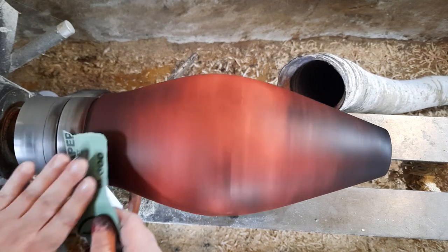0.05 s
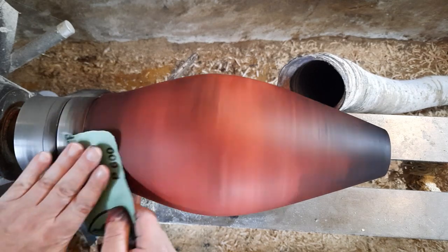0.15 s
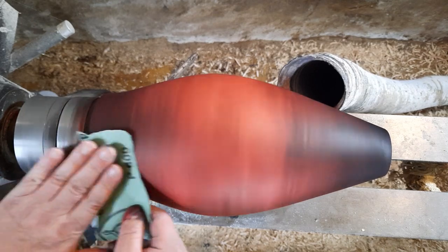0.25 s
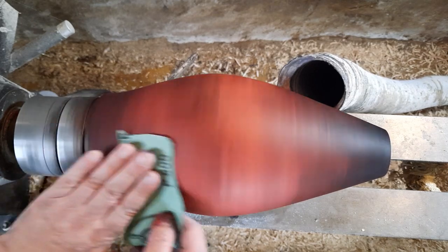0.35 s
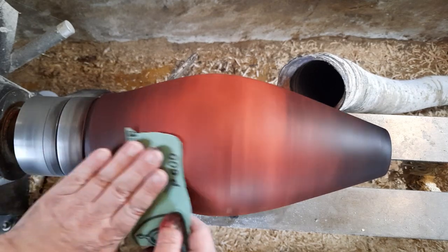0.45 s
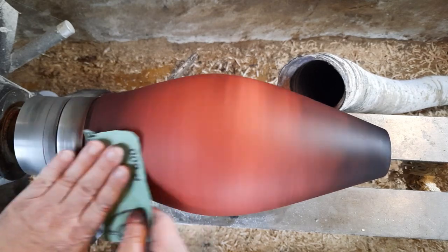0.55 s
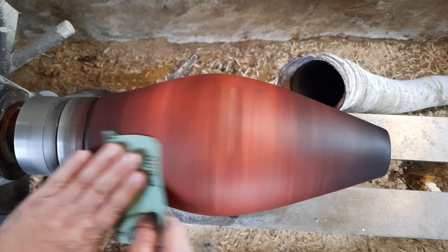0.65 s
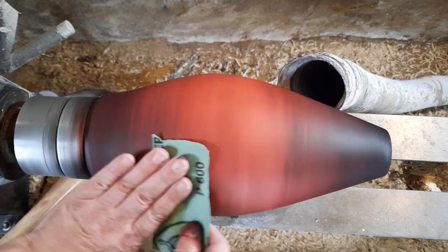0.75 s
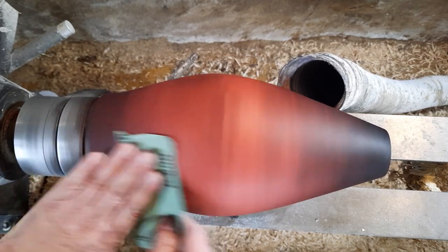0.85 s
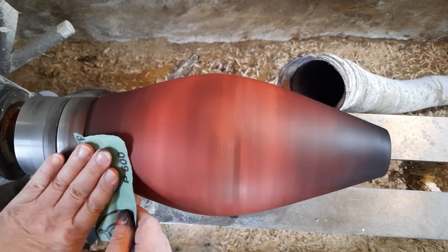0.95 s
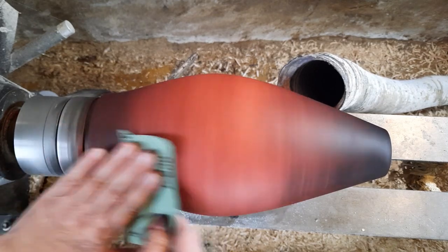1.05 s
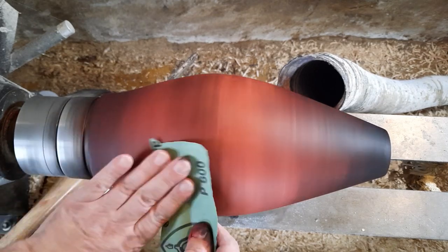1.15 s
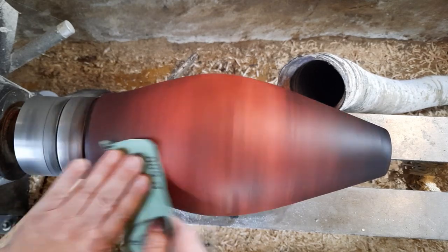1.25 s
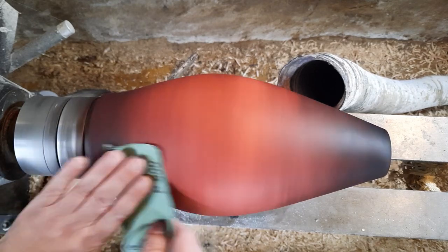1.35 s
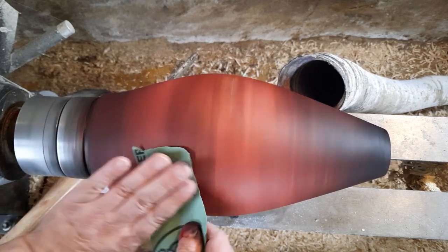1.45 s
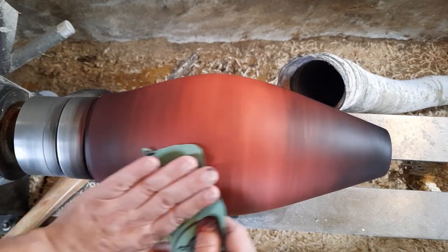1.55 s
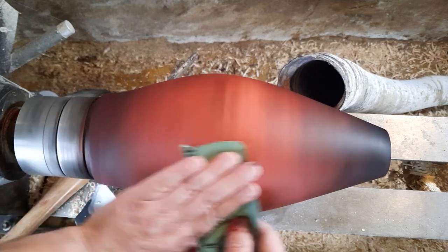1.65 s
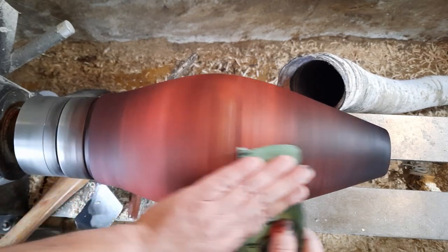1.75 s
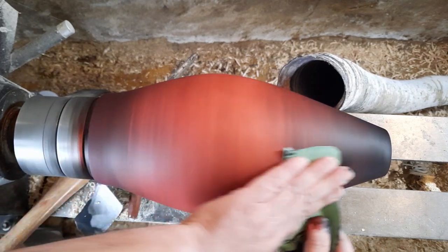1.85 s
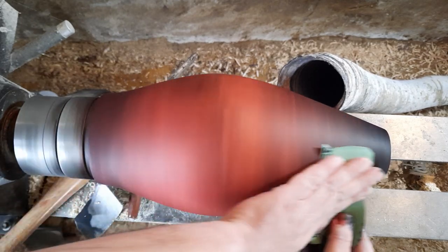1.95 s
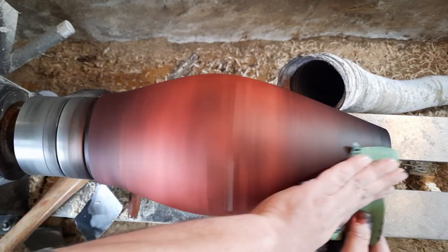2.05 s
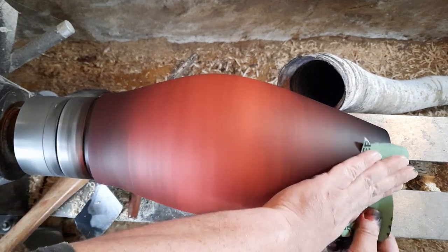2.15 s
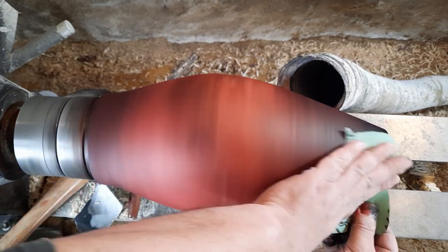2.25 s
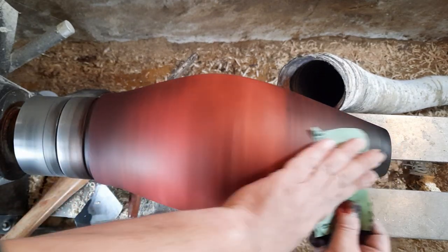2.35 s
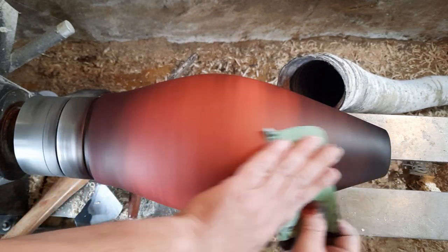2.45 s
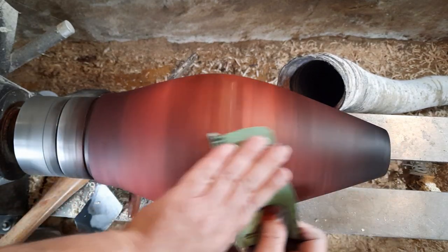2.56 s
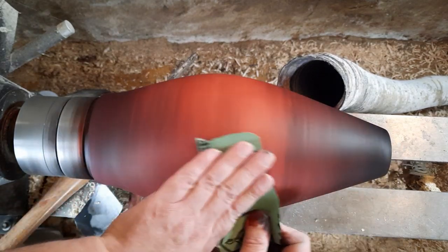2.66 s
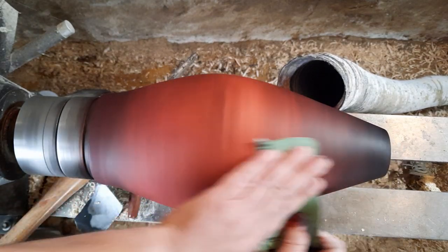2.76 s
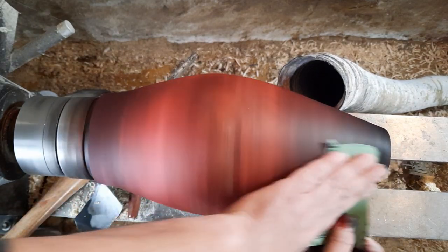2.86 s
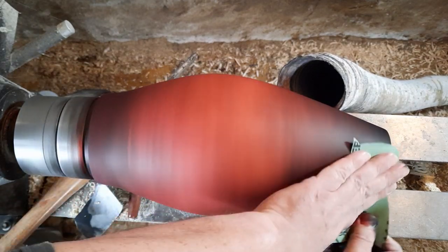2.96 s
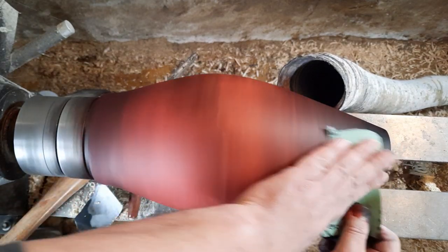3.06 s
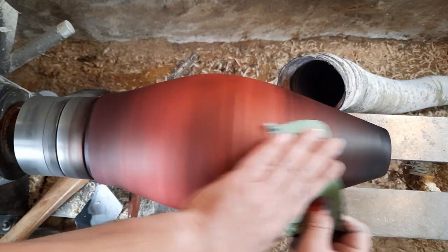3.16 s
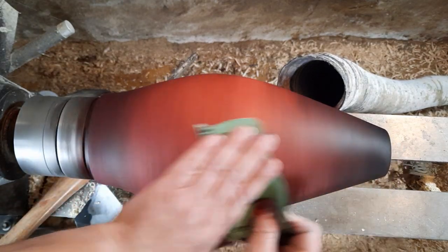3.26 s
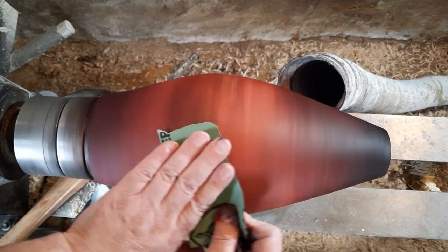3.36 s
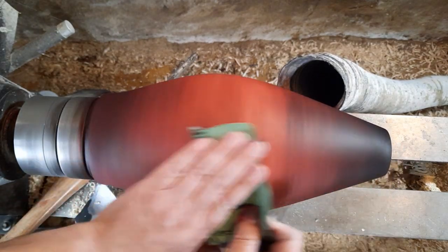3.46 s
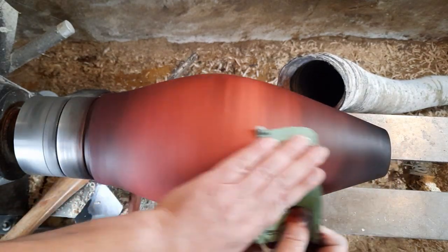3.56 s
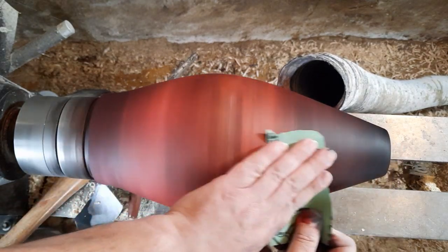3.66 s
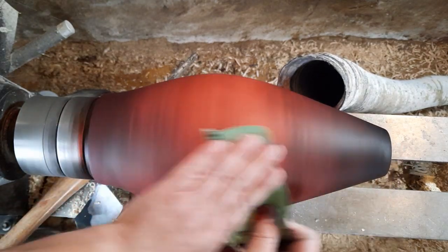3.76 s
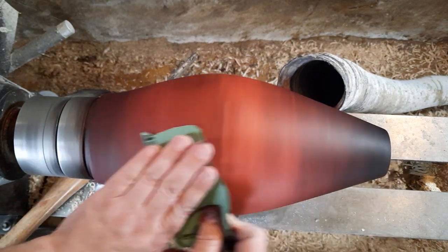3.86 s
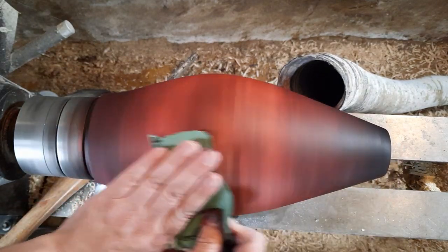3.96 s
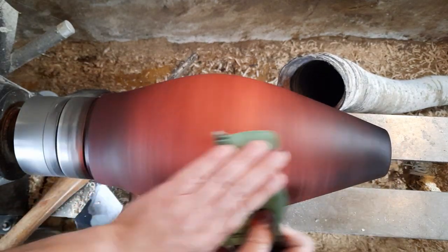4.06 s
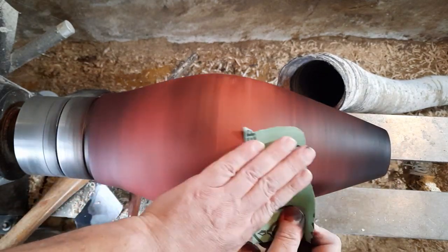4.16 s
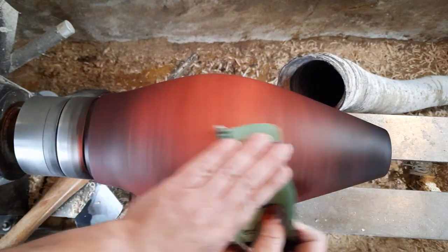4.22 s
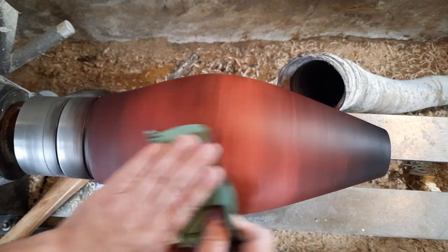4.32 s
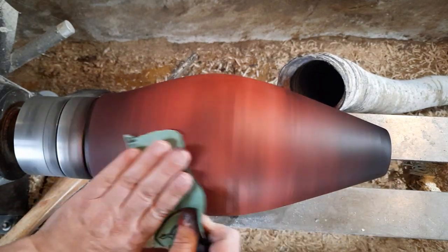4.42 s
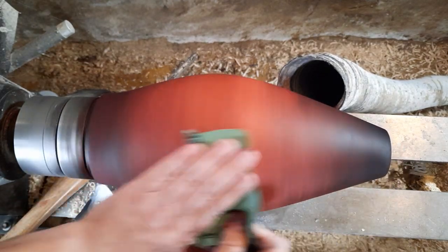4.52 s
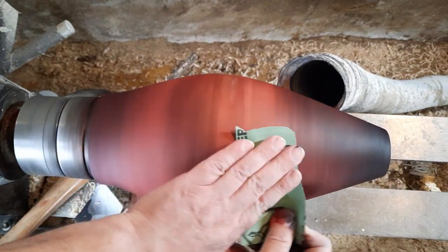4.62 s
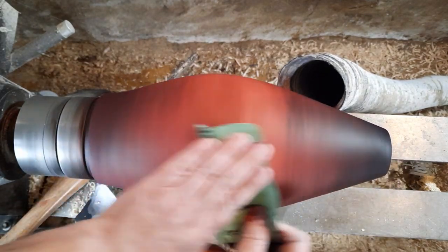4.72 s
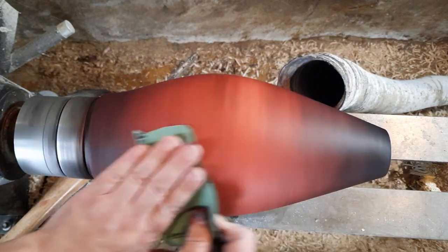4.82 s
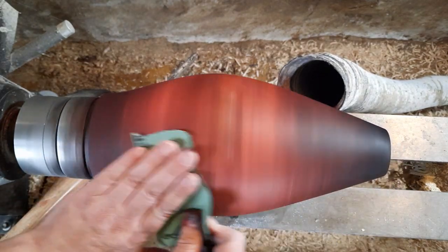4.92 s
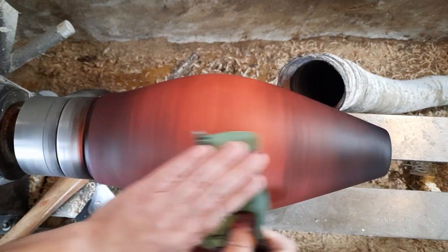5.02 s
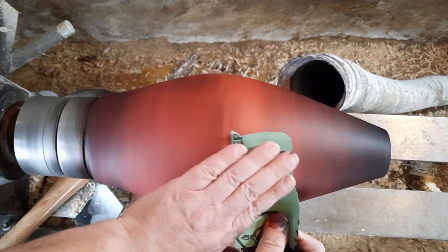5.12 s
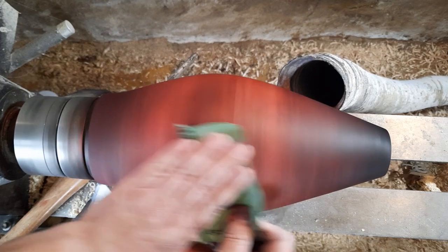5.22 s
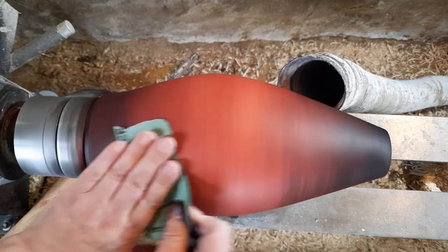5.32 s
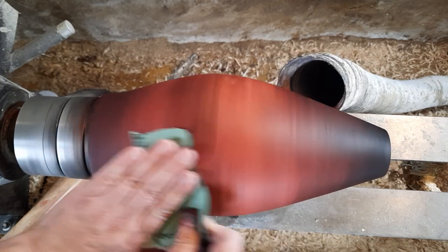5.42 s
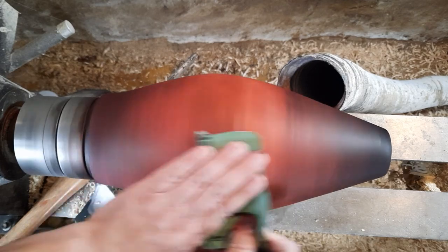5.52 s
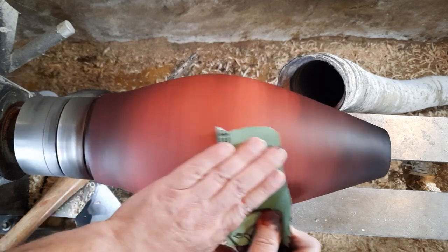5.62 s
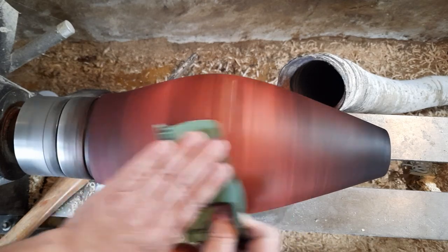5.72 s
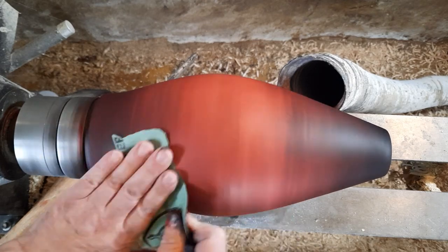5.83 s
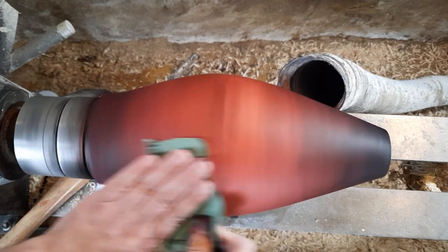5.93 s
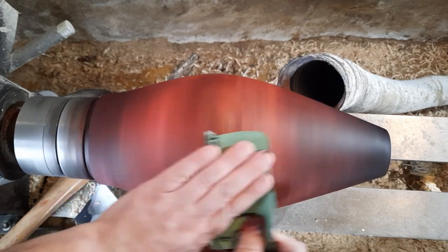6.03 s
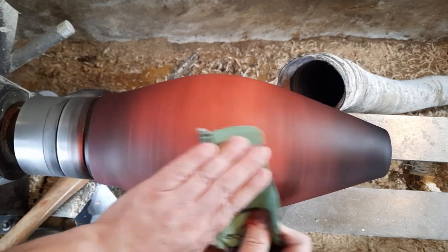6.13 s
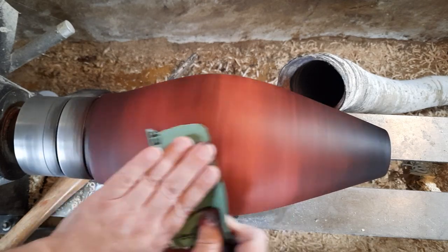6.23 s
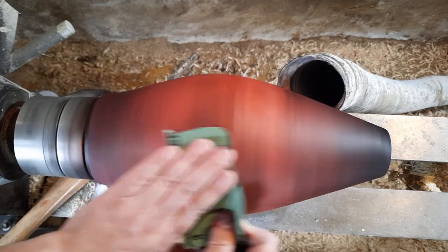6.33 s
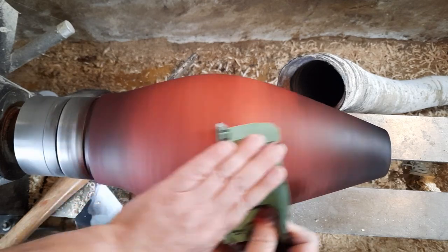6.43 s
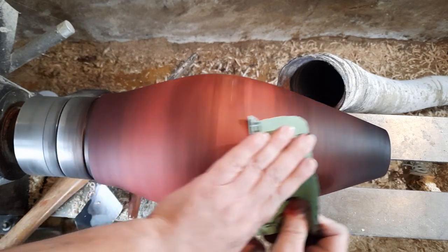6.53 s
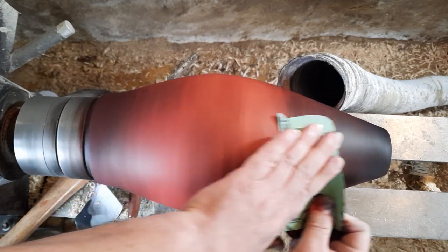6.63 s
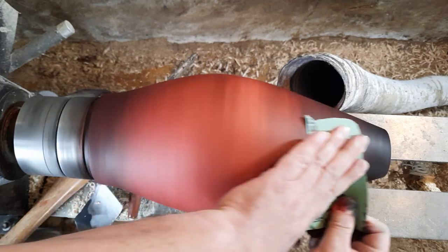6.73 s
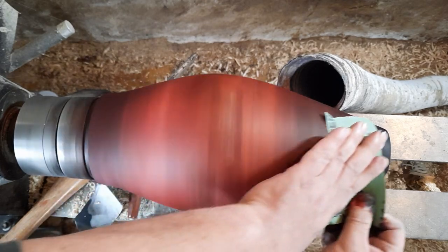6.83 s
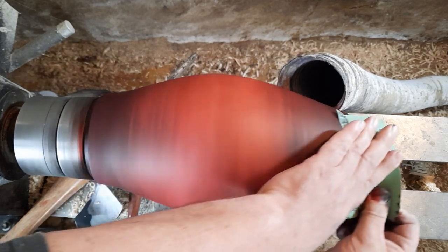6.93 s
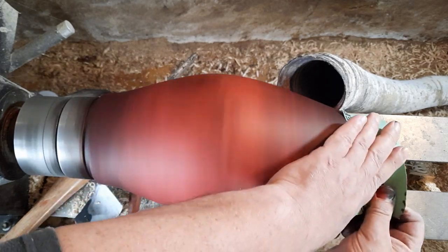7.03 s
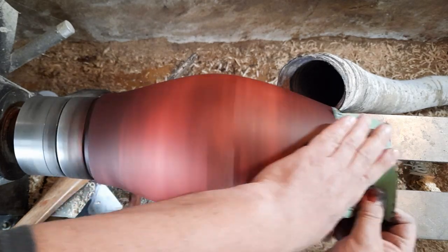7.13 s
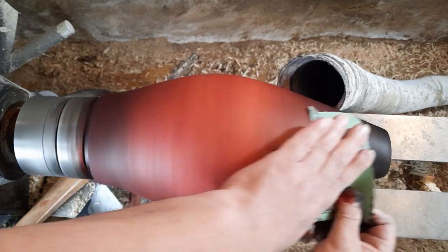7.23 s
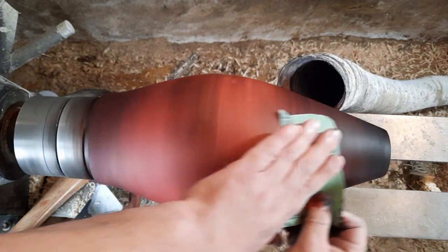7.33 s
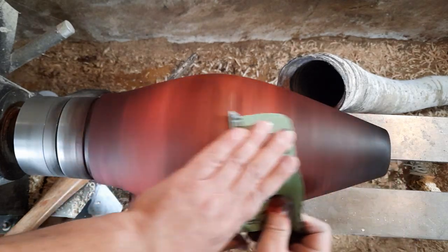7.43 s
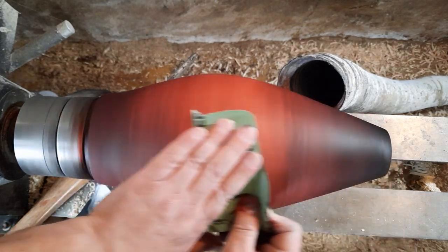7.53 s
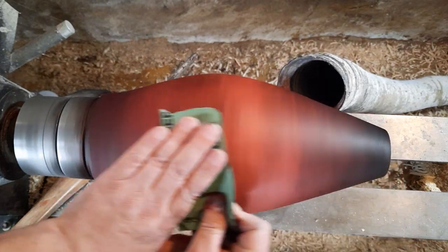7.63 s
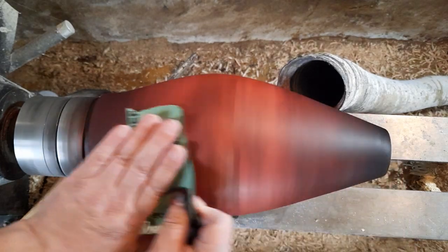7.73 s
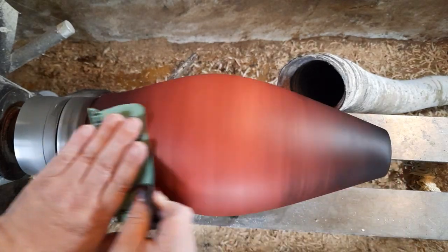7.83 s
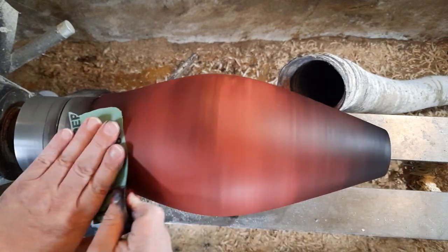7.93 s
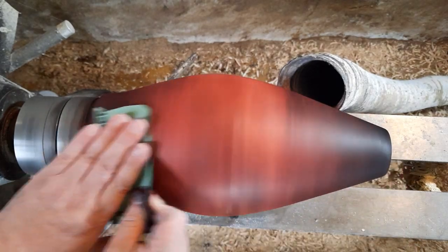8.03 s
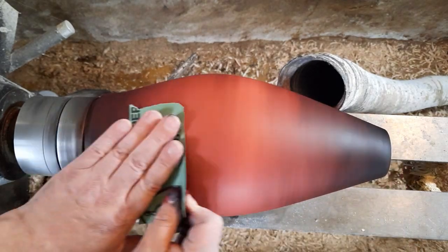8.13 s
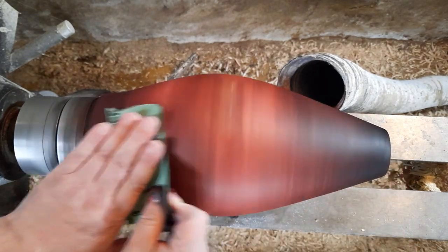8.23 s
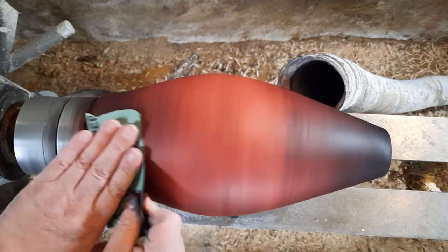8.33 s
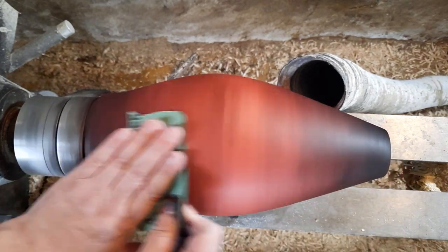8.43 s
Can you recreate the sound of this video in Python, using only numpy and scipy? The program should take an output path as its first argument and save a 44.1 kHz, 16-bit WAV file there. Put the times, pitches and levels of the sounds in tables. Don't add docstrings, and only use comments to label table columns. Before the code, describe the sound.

Close, dry sanding of a hollow wooden vase on a lathe: airy hiss, crisp high sizzle and a woody scrape, rippling as the vase wobbles. A few hard clicks come early, then about two ticks per second from mid-way, with soft rubs and brief low hums. Later the hiss is smoother, with a tiny squeak and one last cluster of catches. Low rumble and faint high whistle continue in a small workshop.

```python
import sys
import numpy as np
from scipy import signal
from scipy.fft import rfft, irfft, next_fast_len
from scipy.io import wavfile
from scipy.ndimage import uniform_filter1d, map_coordinates

SR = 44100
rng = np.random.default_rng(int(sys.argv[2]) if len(sys.argv) > 2 else 0)


def generate_wav(signal):
    frames = np.transpose(np.atleast_2d(signal))
    scaled = np.clip(frames, -1, 1) * 32767
    pcm = np.round(scaled).astype(np.int16)
    wavfile.write(sys.argv[1], SR, pcm)


def magnitude_from_level(level_db):
    exponent = np.asarray(level_db, float) / 20
    return 10 ** exponent


N = 373968

# start_s, peak_db, knock_hz, snap_db (against the knock), width (share of knock_hz)
CATCHES = [(0.622, -33.5, 890, -7, 0.83), (1.291, -17, 2170, -23, 2), (1.431, -20.5, 1780, -23, 0.63),
           (1.717, -15, 2110, 3.5, 1.1), (1.724, -32, 2500, 0, .9), (3.364, -23, 1300, -4, 0.4),
           (3.37, -32, 1300, -9, 0.54), (3.507, -40, 2280, -3, 1), (3.527, -28, 1520, -9, 0.16),
           (3.836, -22.5, 960, -12, 0.28), (4.036, -34, 1110, -9, 0.64), (4.311, -27.5, 870, 0.5, 0.44),
           (4.314, -45, 770, -14, .5), (4.322, -28, 2300, -12, 0.54), (4.342, -28, 3500, -3, .9),
           (4.786, -22.5, 900, -10, 0.96), (4.794, -41, 1000, 6, 0.95), (5.261, -22.5, 830, -6, 0.8),
           (5.736, -32, 950, 3, 0.98), (6.212, -24, 1140, -10, .6), (6.216, -25.5, 1040, -10, 0.79),
           (6.22, -32, 910, 2.5, 1.2), (7.614, -25.5, 2180, -6, 1.1), (7.626, -38, 2200, -14, .4),
           (7.639, -26, 970, 0, 0.47), (3.838, -29, 2000, -6, .6), (4.313, -28, 2300, -8, .7),
           (4.787, -29, 2300, -6, 0.89), (5.262, -29, 2200, -6, 0.9)]
# pitch_hz, level_db
HOLLOW_TONES = [(147.9, 2.5), (170.4, -10), (105.2, -8.5), (214, -14)]
# start_s, peak_db, length_s
HOLLOW_HUMS = [(0.08, -64.5, 0.21), (1.659, -53, 0.082), (3.378, -39, 0.099), (3.543, -45.5, 0.084),
               (3.846, -44, 0.094), (4.321, -47.5, 0.14), (4.506, -46, 0.046), (4.797, -43, 0.11),
               (4.982, -54, 0.11), (5.128, -44.5, 0.05), (5.275, -43.5, 0.1), (5.594, -47, 0.087),
               (5.749, -44, 0.078), (6.081, -48, 0.08), (6.228, -37.5, 0.12), (6.384, -43, 0.1),
               (6.845, -57, 0.078), (7.655, -45.5, 0.092)]
# time_s, left_over_right_db, left_lag_samples, hiss_pitch_percent
PAD_PLACE = [(0, 0.5, 3, 5), (.6, -0.2, -3.5, 0), (.8, -1, -1.5, 6), (1.2, 0, 4.5, 1.5), (1.7, -1.5, 3, 0),
             (2.2, -1, 11, -10), (2.5, -2.5, 4.5, 1), (2.8, -1, 5, -3), (3.1, -2, 11.5, -3),
             (3.4, -2, 0.5, -2), (4.5, -1, 2.5, 2.5), (5.3, -2, -0.5, 2), (6.3, -1.5, 1.5, 1.5),
             (6.9, -2.5, 7.5, -6), (7.3, -2, 7.5, -3), (7.6, -2, 2.5, 3), (8, 0.2, -3.5, 2),
             (8.48, -0.5, 4, 2)]


def unit(x):
    return x / np.sqrt(np.mean(x ** 2) + 1e-20)


def peak(x):
    return x / np.abs(x).max()


def along(points, hz):
    f, v = np.transpose(points)
    return np.interp(np.log(hz + 1), np.log(f + 1), v)


def curves(rows):
    s, *cols = np.transpose(rows)
    return [np.interp(np.arange(N) / SR, s, c) for c in cols]


def wobble(rate):
    coarse = np.arange(0, N + 8, 8)
    knots = rng.standard_normal(int(N * rate / SR) + 4)
    return np.interp(np.arange(N), coarse, map_coordinates(knots, [coarse * rate / SR]))


def filtered(x, response):
    m = next_fast_len(x.shape[-1] + 8192)
    return irfft(rfft(x, m) * response(np.fft.rfftfreq(m, 1 / SR)), m)[..., :x.shape[-1]]


def resonance(f, hz, width):
    return 1j * f * width / (hz * hz - f * f + 1j * f * width)


def lagged(x, lag):
    left = map_coordinates(x, [np.arange(len(x)) - lag]) if np.any(lag) else x
    return np.array([left, x])


def rush(spectrum, alike, lag, patchy_db, grit_db, shift=None):
    grains = rng.standard_normal((3, N)) * magnitude_from_level(grit_db * wobble(900))
    alike = np.clip(alike, 0, 1)
    pair = np.sqrt(alike) * lagged(grains[0], lag) + np.sqrt(1 - alike) * grains[1:]
    z = signal.stft(pair, nperseg=512)[2]
    patches = uniform_filter1d(rng.standard_normal(z.shape[1:]), 8, 0)
    gain_db = patchy_db * unit(uniform_filter1d(patches, 8, 1))
    if shift is not None:
        hz = np.fft.rfftfreq(512, 1 / SR)[:, None]
        stretch = 1 + shift[np.minimum(np.arange(z.shape[2]) * 256, N - 1)] / 100
        gain_db = gain_db + along(spectrum, hz / stretch) - along(spectrum, hz)
    pair = signal.istft(z * magnitude_from_level(gain_db), nperseg=512)[1][:, :N]
    return unit(filtered(pair, lambda hz: magnitude_from_level(along(spectrum, hz))))


def swells(rows):
    t = np.arange(N) / SR
    out = np.zeros(N)
    for s, db, rise, fall in rows:
        near = slice(max(round((s - 3 * rise) * SR), 0), round((s + 4 * fall) * SR))
        u = t[near] - s
        out[near] += magnitude_from_level(2 * db) * np.where(u < 0, np.exp(-(u / rise) ** 2), np.exp(-2 * u / fall))
    return out


def shop(x):
    # pitch_hz, time_to_fall_60_db_s
    echo_times = [(200, 0.57), (1000, 0.23), (4000, 0.25), (12000, 0.14)]
    hz, t, z = signal.stft(rng.standard_normal((2, SR // 6)), SR, nperseg=128)
    fading = z * magnitude_from_level(-60 * t / along(echo_times, hz)[:, None])
    tail = signal.istft(fading, SR, nperseg=128)[1]
    return signal.fftconvolve(np.pad(x, (70, 0))[None], tail / np.linalg.norm(tail[0]), axes=1)


def ringing(x):
    # pitch_hz, width_hz, level_db
    wall_tones = [(218.6, 3.7, 0), (355, 64, 3), (479, 1.03, 9), (762, 16, -6.5), (917, 39, -2),
                  (1335, 7.6, 1.5), (1690, 9.7, 0), (2040, 16, 0), (3000, 25, -8), (3890, 16, 0.5)]
    return filtered(x, lambda f: 1 + sum(magnitude_from_level(g) * resonance(f, c, w) for c, w, g in wall_tones))


def leaning(column):
    # time_s, scrape_db, body_db, length_s
    tilts = [(0.525, 6, 3.5, .05), (.68, 7, 0, .03), (1.1, -4, -6, 0.045), (1.3, -5, 0, .04),
             (2.3, 3.5, -2, .18), (2.567, -1.5, 0, .04), (3.416, 4.5, -0.5, 0.06), (3.62, 0, -2, .07),
             (3.72, -2, -3, 0.044), (4.197, -0.5, -1.5, 0.064), (4.42, -5, 4, 0.033), (4.724, -6, 3, 0.03),
             (4.987, 1, 2, 0.053), (5.172, -2.5, -1, 0.028), (5.65, -2, -4, 0.042), (5.83, -3, -7, 0.044),
             (6.13, -5, -1, 0.036), (6.67, -0.5, 1, .1), (7.117, 3, -1, 0.037), (7.74, 0, 5, .05),
             (7.922, 1, -2, .03), (8.367, 1, 5, 0.047)]
    t = np.arange(0, N, 64) / SR
    tilt_db = sum(db[column] * np.exp(-((t - s) / length) ** 2) for s, *db, length in tilts)
    return np.interp(np.arange(N) / SR, t, tilt_db)


def room_air():
    # pitch_hz, level_db (per Hz)
    air_colour = [(1000, -30), (2000, -10), (3200, -2), (4500, 0), (6500, 0), (9500, -3), (12000, -10),
                  (16000, -16)]
    return magnitude_from_level(-62.5) * rush(air_colour, 0.088, 0, patchy_db=3.5, grit_db=1.0)


def shaken():
    # start_s, peak_db, length_s
    thuds = [
        (0.503, -59, 0.071),
        (1.932, -52, 0.17),
    ]
    # level_db (against the hum), rise_s, fall_s
    shake = [
        (-13.5, 0.042, 0.17),
        (-10.5, 0.016, 0.07),
        (-12, 0.068, 0.1),
    ]
    rest_levels_db = (-70, -60.5, -74)
    after = [swells([(s + rise, db + g, rise, fall) for s, db, _ in HOLLOW_HUMS])
             for g, rise, fall in shake]
    after[0] = after[0] + swells([(s, db, .04, length) for s, db, length in thuds])
    return [np.sqrt(magnitude_from_level(2 * rest_db) + power) for rest_db, power in zip(rest_levels_db, after)]


def frame():
    # pitch_hz, level_db (per Hz)
    rumble_colour = [(15, -41), (25, -3), (59, -2), (80, -8.5), (97, -10), (130, -16), (170, -35),
                     (290, -120)]
    # pitch_hz, level_db (per Hz)
    body_colour = [(71, -41), (120, -6.5), (220, 0.5), (242, -9.5), (286, -5), (389, -11.5), (485, -1),
                   (545, -5.5), (693, -3), (840, -11), (1200, -8.5), (1560, -8.5), (2640, -120)]
    spin_up_s = 0.058
    belly_from_s, belly_to_s, belly_db = 3.23, 6.8, 3.5
    t = np.arange(N) / SR
    rumble_gain, body_gain, hum_gain = shaken()

    rumble = rumble_gain * magnitude_from_level(3.1 * wobble(7.4))
    rumble = rumble * rush(rumble_colour, 0.62, 0, patchy_db=2.5, grit_db=-0.5)

    on_belly = np.clip(np.minimum(t - belly_from_s, belly_to_s - t) / 0.1, 0, 1)
    body_gain = body_gain * (1 - np.exp(-t / spin_up_s)) * magnitude_from_level(belly_db * on_belly + leaning(1))
    body = unit(ringing(rush(body_colour, 0.38, 0, patchy_db=3.5, grit_db=-0.5)))
    body = body_gain * magnitude_from_level(0.62 * wobble(15)) * body

    hum = np.sin(2 * np.pi * HOLLOW_TONES[0][0] * t + 2.0 * wobble(9))
    hum = hum_gain * magnitude_from_level(2.2 * wobble(5.9)) * hum
    return rumble + body + hum * magnitude_from_level([[-1.3], [1.3]])


def drive():
    # pitch_hz, level_db (per Hz)
    drive_colour = [(400, -60), (800, -45), (1500, -18), (3000, -16), (6000, -29), (7600, -14), (8000, 12),
                    (8500, 5), (9300, -20), (12000, -20), (15900, -13)]
    # level_db of the centre, the lower side and the upper side
    whistle_db = [-60.5, -63.5, -69]
    # pitch_hz, level_db
    buzz_tones = [(3885, -68), (4010, -74)]
    whistle_hz, waver_db, waver_rad, waver_per_s = 8000, 2.5, .45, 6.3
    side_hz, side_start_hz, side_rise_s = 77, 44, .35
    t = np.arange(N) / SR
    noise = magnitude_from_level(-58.0) * rush(drive_colour, 0.3, 0, patchy_db=-4.5, grit_db=6)
    distance_hz = side_hz - (side_hz - side_start_hz) * np.exp(-t / side_rise_s)
    beat = 2 * np.pi * np.cumsum(distance_hz) / SR
    carrier = 2 * np.pi * whistle_hz * t
    whistle = np.zeros(N)
    for side, db in zip((0, -1, 1), whistle_db):
        gain = magnitude_from_level(db + 7.0 + waver_db * wobble(waver_per_s))
        whistle += gain * np.sin(carrier + side * beat + waver_rad * wobble(waver_per_s))
    for hz, db in buzz_tones:
        whistle += magnitude_from_level(db + 3.5 * wobble(12)) * np.sin(2 * np.pi * hz * t + 1.3 * wobble(14))
    return noise + whistle * magnitude_from_level([[1.5], [-6]])


def motor_whine():
    # pitch_hz, width_hz, level_db
    housing = (511, 29, -39.5)
    start_hz, rise_hz_per_s, end_s, grows_db_per_s = 403, 450, 0.55, 4
    off_peak = 0.053
    t = np.arange(N) / SR
    whine_hz = start_hz + rise_hz_per_s * t
    passing = np.abs(resonance(whine_hz, *housing[:2])) ** 2 + off_peak * np.clip(t / .3, 0, 1) ** 2
    passing = passing * np.clip((end_s - t) / 0.068, 0, 1)
    throb_db = 5.3 * np.sin(2 * np.pi * 29 * t + 2.7)
    gain = passing * magnitude_from_level(housing[2] + grows_db_per_s * (t - 1.0) + throb_db)
    return gain * np.sin(2 * np.pi * np.cumsum(whine_hz) / SR) * magnitude_from_level([[-4], [3]])


def hollow():
    out, t = np.zeros(N + SR), np.arange(SR // 2) / SR
    for s, db, length in HOLLOW_HUMS:
        swell = (1 - np.exp(-t / 0.024)) * np.exp(-(t / length) ** 3)
        hum = sum(magnitude_from_level(g) * np.sin(2 * np.pi * c * rng.normal(1, 0.017) * t) for c, g in HOLLOW_TONES)
        out[round((s - .019) * SR):][:len(t)] += magnitude_from_level(db + 0.5) * swell * hum
    return out[:N] * magnitude_from_level([[-2.2], [2.2]])


def chirps():
    # start_s, from_hz, to_hz, level_db, length_s
    squeaks = [
        (6.879, 2480, 3450, -36, 0.02),
        (6.879, 4700, 5800, -36, 0.017),
        (5.111, 12000, 9800, -31.5, 0.0059),
    ]
    out = np.zeros(N)
    for s, from_hz, to_hz, db, length in squeaks:
        u = np.linspace(0, 1, round(length * SR))
        jitter = .09 * np.interp(u, np.linspace(0, 1, 9), rng.standard_normal(9))
        glide = 2 * np.pi * np.cumsum(from_hz + (to_hz - from_hz) * np.tanh(3 * u)) / SR
        squeak = np.sqrt(u) * (1 - u) * np.sin(glide + 22 * jitter)
        out[round(s * SR):][:len(u)] += magnitude_from_level(db + 9.5) * squeak
    return out * magnitude_from_level([[-2], [2]]) + magnitude_from_level(-8) * shop(out)[:, :N]


def rubs():
    # time_s, peak_db, pitch_hz, length_s
    soft_rubs = [(1.262, -47, 1400, .015), (1.393, -41, 3800, .008), (1.564, -30, 11000, .003),
                 (5.112, -20, 12000, .003), (5.112, -31, 2100, 0.0057), (1.642, -28, 3000, 0.011),
                 (3.74, -32, 3800, .008), (3.507, -29, 2120, 0.011), (4.018, -24, 3300, .006),
                 (4.023, -33, 1210, 0.021), (4.334, -26, 3000, 0.017), (4.49, -33, 1450, 0.0072),
                 (4.745, -23.5, 3830, 0.011), (4.769, -31, 1900, 0.008), (4.807, -32, 1500, 0.013),
                 (5.287, -26.5, 2800, 0.015), (5.555, -31.5, 1650, 0.015), (5.586, -25, 1660, 0.0057),
                 (5.717, -33.5, 1280, 0.012), (5.74, -29.5, 1500, 0.011), (6.031, -36.5, 1050, 0.014),
                 (6.057, -29, 1500, 0.0064), (6.205, -24, 3500, 0.0067), (6.245, -34.5, 1100, .008),
                 (6.372, -28, 1200, 0.013), (7.617, -26, 2200, 0.01), (7.651, -26, 3000, 0.01),
                 (7.691, -33, 2600, 0.026), (8.456, -44, 1000, 0.012)]
    out, t = np.zeros((2, N + SR)), np.arange(4096) / SR - .045
    pans, lags, _ = curves(PAD_PLACE)
    for s, db, hz, length in soft_rubs:
        slips = rng.standard_normal(len(t)) ** 3 * np.exp(-(t / length) ** 2)
        colour = lambda f: resonance(f, hz, 1.1 * hz) * resonance(f, hz, 3 * hz)
        rub = magnitude_from_level(db) * ringing(peak(filtered(slips, colour)))
        at = round((s + t[0]) * SR)
        side = magnitude_from_level([[pans[at] / 2], [-pans[at] / 2]])
        out[:, at:at + len(t)] += side * lagged(rub, lags[at])
        tail = magnitude_from_level(-2) * side * shop(rub)
        out[:, at:at + tail.shape[1]] += tail
    return out[:, :N]


def ticks():
    # start_s, peak_db, knock_hz
    bumps = [
        (0.234, -47, 345),
        (.35, -53.5, 350),
        (.94, -56, 300),
        (1.305, -38, 557),
        (1.9, -55, 197),
        (1.975, -48.5, 790),
    ]
    # pitch_hz, width_hz, level_db
    snap_tones = [(2040, 2300, 6), (3900, 630, 14.5), (6900, 2800, 11)]
    rows = [(*catch, -19.5) for catch in CATCHES]
    rows += [(*bump, -40, 0.36, -4.5) for bump in bumps]
    out, t = np.zeros((2, N + SR)), np.arange(2048) / SR
    pans, lags, _ = curves(PAD_PLACE)

    def snap(f):
        tones = sum((-1) ** k * magnitude_from_level(g) * resonance(f, c, w) for k, (c, w, g) in enumerate(snap_tones))
        return tones * resonance(f, 4000, 6000) / (1 + 1j * f / 9000) ** 2

    for s, db, hz, snap_db, width, scuff_db in rows:
        soft = lambda f: resonance(f, hz, width * hz) * resonance(f, hz, 2 * hz) / (1 + 1j * f / hz)
        blow = 1. * (np.arange(len(t)) == 8)
        blow[rng.integers(20, 160, size=4)] = rng.uniform(-.15, .15, size=4)
        slips = rng.standard_normal(len(t)) ** 3 * np.exp(-t / 0.017) * (t > .003)
        knock, scuff = (peak(filtered(x, soft)) + magnitude_from_level(snap_db + 3) * peak(filtered(x, snap))
                        for x in (blow, slips))
        knock = magnitude_from_level(db + 2) * ringing(knock + magnitude_from_level(scuff_db) * scuff)
        at = round((s + .0017 - .8 / hz) * SR)
        side = magnitude_from_level([[pans[at] / 2 - .4], [.4 - pans[at] / 2]])
        out[:, at:at + len(t)] += side * lagged(knock, lags[at])
        tail = magnitude_from_level(-11.5) * side * shop(knock)
        out[:, at:at + tail.shape[1]] += tail + .5 * tail[::-1]
    return out[:, :N]


def hand_on_vase():
    # time_s, pressure_db, sharp_grit_db, runout_felt_db, ridges_felt_db
    hand = [(0, -74, -8, 4, -11), (.04, -57, 2, -2, 3), (.14, -56, 7, 0.5, -0.5),
            (.27, -36.5, 6.5, -1, 2.5), (.6, -38.5, 8, 0, 0), (1.2, -39.5, 4, -0.5, 1),
            (1.6, -41.5, 1, -1, 1.5), (2.0, -39, 3.5, 0.5, 0.2), (2.7, -39, 2.5, -0.5, 0),
            (3.2, -41, 2, 1, 0.1), (3.9, -38.5, 1.5, -0.5, 0.5), (4.6, -38.5, 1.5, 1.5, 0.9),
            (5.6, -39, 1.5, 0.5, 0.4), (6.3, -39.5, 0.5, -0.5, 0.6), (6.8, -41.5, 0, 0, 0),
            (7.4, -41, -0.5, 0.5, -0.5), (7.9, -39.5, 1.5, 1.5, 0.8), (8.48, -40.5, 1, -1.5, -0.5)]
    # time_s, change_db, length_s, more_for_sharp_grit_db
    jolts = [(0.327, 0.5, 0.018, 3), (0.47, 1.5, .03, 0), (0.652, 3.5, 0.048, 1), (0.798, 1, 0.11, -2),
             (0.545, -1.5, 0.034, -0.5), (0.995, 0.5, 0.076, 4), (1.112, 3, 0.035, 1),
             (1.252, -2, 0.039, 6.5), (1.37, -8, 0.047, 6), (1.52, -8.5, 0.061, 4.5), (1.651, 4, 0.02, -5),
             (1.924, 0.5, .05, 1), (2.536, -1, 0.034, 0.5), (2.686, -1, 0.097, 3), (2.884, 1.5, 0.037, 3),
             (3.31, 2.5, 0.099, 0), (3.683, -2.5, 0.096, 1), (4.12, -1.5, .03, 1.5), (4.176, -3, 0.038, 0),
             (4.323, -1, 0.027, -6), (4.447, 0.5, .06, 0), (5.275, 0.5, 0.05, -7), (5.425, 0, 0.1, 3.5),
             (5.665, -1, 0.085, -3), (5.912, -0.5, 0.046, 4), (6.036, 1.8, .04, -2), (6.13, -1, .04, 4.5),
             (6.545, -0.5, 0.062, -3), (6.953, -1, 0.071, 4), (7.073, -4, 0.057, 1), (7.344, 0, 0.064, 5),
             (7.79, 2.5, 0.069, 2), (8.118, 1.5, 0.04, 1.5), (8.29, 5, 0.023, -3), (8.422, 1.5, 0.044, 4),
             (0.128, 0, .02, -1), (0.368, -1, .03, 0.5), (1.447, -1.5, 0.028, 6.5), (7.602, 2.5, .04, 0),
             (7.724, 0, .04, -2), (7.87, -1, .04, -2), (7.94, -0.5, .03, 0), (8.235, 1.5, .015, -2),
             (4.9, -1, .06, 2.5), (0.524, 2, 0.027, 0), (0.875, 1, .025, 1), (5.498, 1.5, 0.035, -5),
             (5.962, 1, .03, -2), (3.77, -0.5, .03, -1), (5.057, 0.5, 0.045, -4)]
    # start_s, hiss_bite_db, sharp_grit_bite_db, settling_s
    landings = [
        (.037, 2, 12, .008),
        (.156, 5, 4, .04),
        (1.258, 2, 1, .03),
        (1.564, 4, 7, .015),
        (1.636, 2.5, 0, .02),
        (4.835, 0.5, -1, .05),
    ]
    turn_s = .4748
    high_s, fine_high_s, oval_s, ridge_s = 3.5, 3.49, 3.49, .32
    oval, fine_swing_share = 0.69, 1.46
    press_db, sharp_db, runout_db, ridge_db = curves(hand)
    t = np.arange(N) / SR
    turn = lambda times, s: np.cos(2 * np.pi * times * (t - s) / turn_s)

    slow = t[::64]
    jolted = sum(np.outer((db, more_db), np.exp(-np.abs((slow - s) / length) ** 3))
                 for s, db, length, more_db in jolts)
    jolt_db, bite_db = (np.interp(t, slow, j) for j in jolted)
    landed = sum(np.outer(db, (t > s) * np.exp(-np.abs(t - s) / fall)) for s, *db, fall in landings)

    bumpy = ridge_db * turn(3, ridge_s) + jolt_db
    swing = bumpy + runout_db * turn(1, high_s) + landed[0]
    wobbling = turn(0.96, fine_high_s) + oval * turn(2.4, oval_s)
    fine_swing = bumpy + landed[1] + bite_db + fine_swing_share * runout_db * wobbling
    return press_db, sharp_db, swing, fine_swing


def pad():
    # pitch_hz, level_db (per Hz)
    hiss_colour = [(1470, -22.5), (2500, -11.5), (2750, -13), (3070, -10), (4040, -6), (6010, 0.5),
                   (8010, 3.5), (9420, -7), (10500, -3.5), (13600, -6), (22000, -16.5)]
    # pitch_hz, level_db (per Hz)
    sizzle_colour = [(5300, -33), (9000, -14.5), (9500, -12), (10600, -5.5), (12400, 0.5), (14000, -2),
                     (15100, 0), (15700, -11), (16000, -2.5)]
    # pitch_hz, level_db (per Hz)
    scrape_colour = [(470, -19.5), (800, -8), (1030, -5), (1260, -3.5), (1530, -5), (1680, -3), (2740, -2),
                     (4000, -2), (5200, -4.5), (8800, -120)]
    scrape_db, dulling, scrape_swing = -6.5, 2.29, .6
    drag_db, drag_lead_s, drag_s = -27, .002, 0.02
    press_db, sharp_db, swing, fine_swing = hand_on_vase()
    pan_db, lag, shift = curves(PAD_PLACE)
    flutter = 0.56 * wobble(18) + 0.3 * wobble(65)

    hiss = rush(hiss_colour, 0.046, lag, patchy_db=1.36, grit_db=0.88, shift=shift)
    hiss = magnitude_from_level(press_db + swing + flutter) * hiss

    sizzle = rush(sizzle_colour, 0.088, lag, patchy_db=1.5, grit_db=0.5)
    sizzle = magnitude_from_level(press_db + sharp_db + fine_swing + 0.72 * flutter) * sizzle

    drag = swells([(s, db + drag_db, drag_lead_s, drag_s) for s, db, *_ in CATCHES])
    steady_db = press_db + scrape_db - dulling * sharp_db + scrape_swing * swing + leaning(0)
    scrape_gain = np.sqrt(magnitude_from_level(2 * steady_db) + drag) * magnitude_from_level(1.4 * flutter + wobble(25))
    scrape = unit(ringing(rush(scrape_colour, 0.18, lag, patchy_db=1.5, grit_db=0.5)))
    return magnitude_from_level(2.5 + np.array([pan_db, -pan_db]) / 2) * (hiss + sizzle + scrape_gain * scrape)


def scene():
    lathe = room_air() + frame() + drive() + motor_whine()
    return lathe + hollow() + chirps() + rubs() + ticks() + pad()


def low_pass(x):
    return signal.sosfilt(signal.butter(12, 15882, fs=SR, output="sos"), x)


def record(dry):
    # pitch_hz, left_over_right_db
    port_colour = [(100, 0), (300, 5), (700, -3), (2400, -0.5), (8000, -1.5), (15000, -5.5)]
    top_hz, low_hz = 15870, 48
    held = dry / (1 + np.abs(dry / 1.1) ** 6) ** (1 / 6)

    def port(hz):
        colour = magnitude_from_level(along(port_colour, hz) * [[.5], [-.5]])
        return colour * (hz < top_hz) / (1 + (low_hz / (hz + 1)) ** 6)

    return low_pass(filtered(held, port))


dry = scene()
out = record(dry)
generate_wav(out)
```